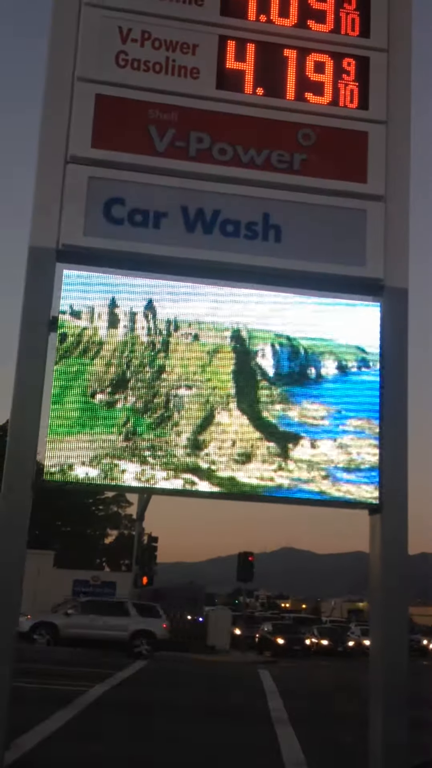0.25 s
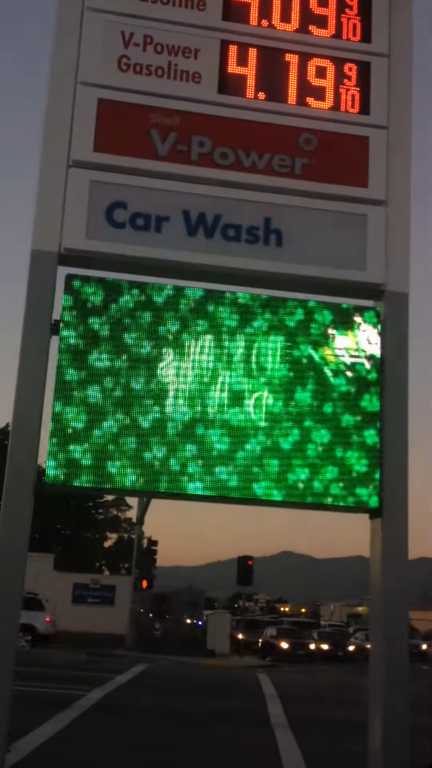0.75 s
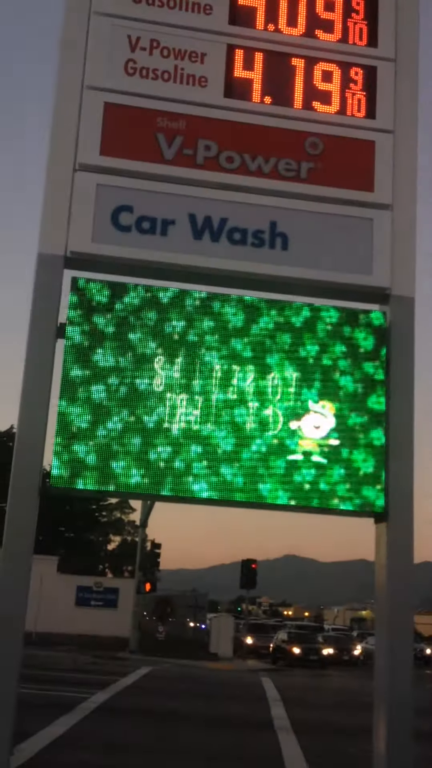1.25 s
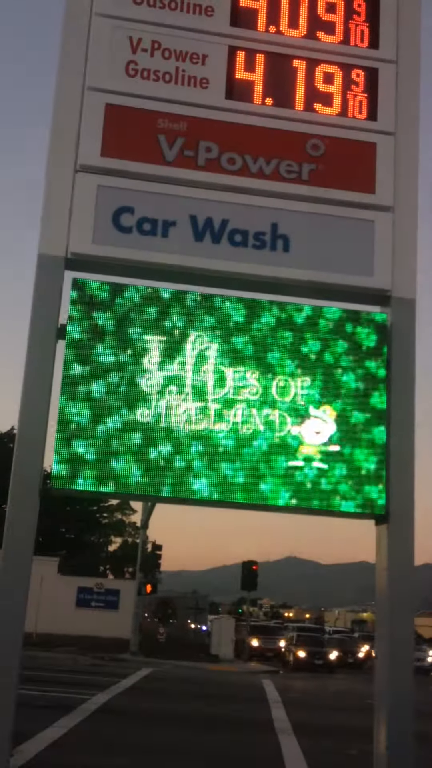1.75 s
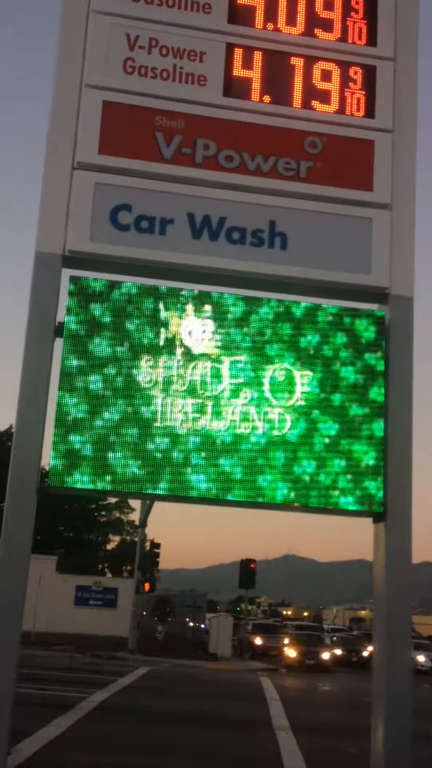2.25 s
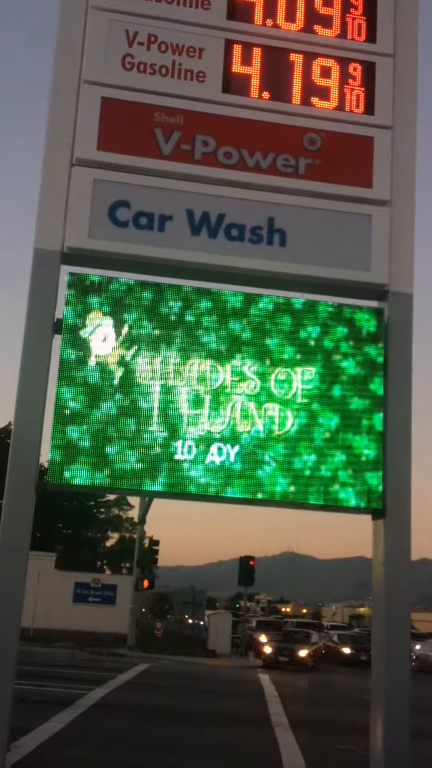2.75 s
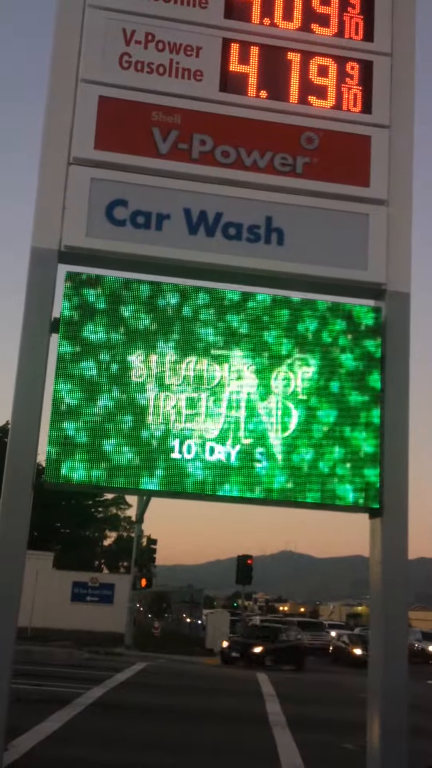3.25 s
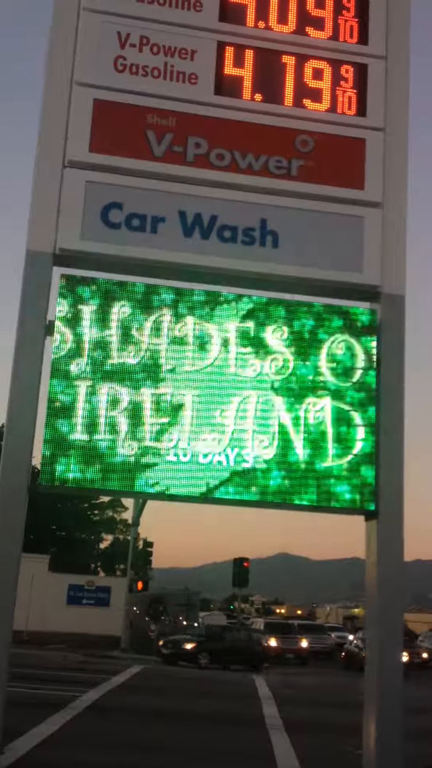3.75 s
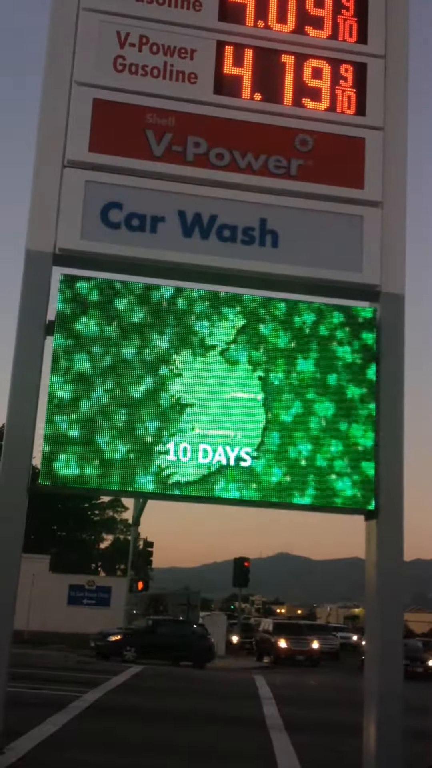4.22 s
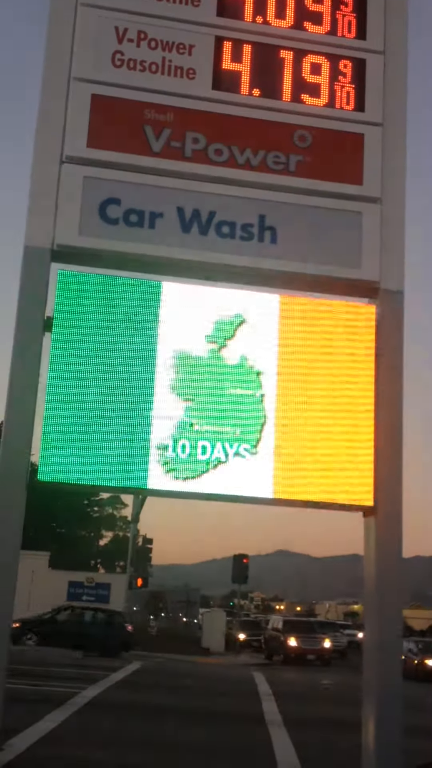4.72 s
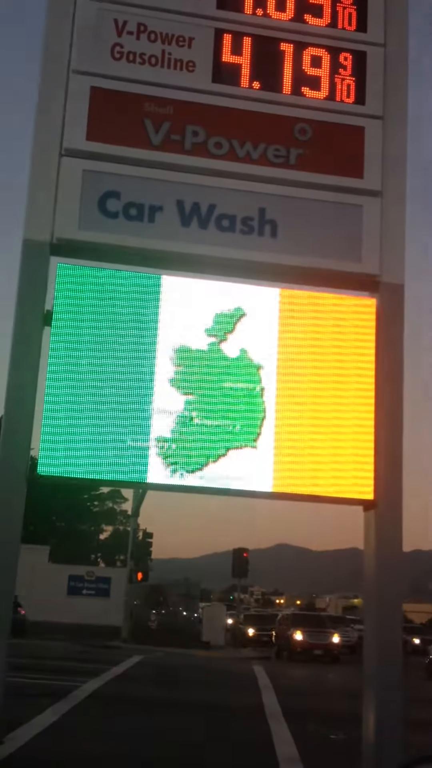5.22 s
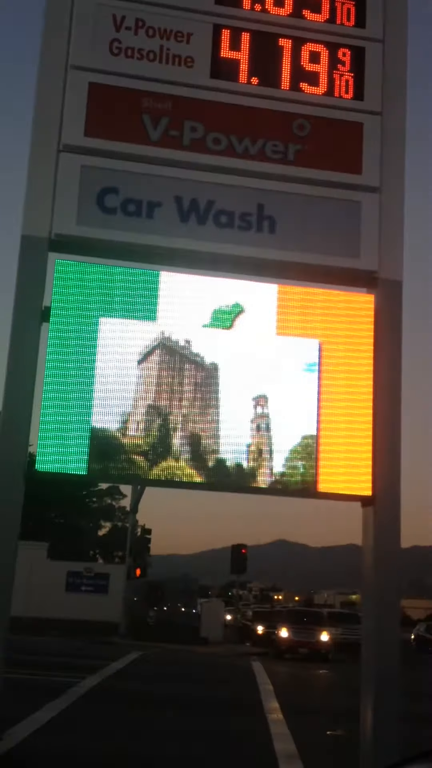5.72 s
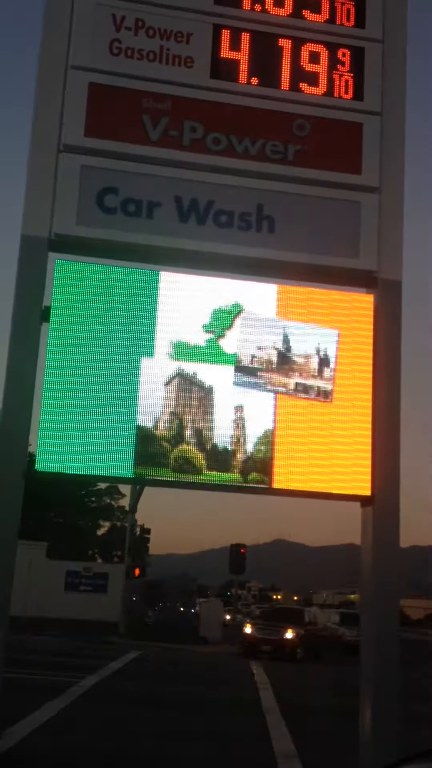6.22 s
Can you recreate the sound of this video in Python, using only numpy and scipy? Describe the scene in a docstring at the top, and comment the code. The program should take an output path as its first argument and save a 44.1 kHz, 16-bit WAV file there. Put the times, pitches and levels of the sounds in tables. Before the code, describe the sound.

Low idling traffic rumble under faint steady hiss; a twin-cylinder motorcycle pulls away, revs up, shifts with dull pops, and rides on.

```python
"""Idling traffic rumbles under a steady hiss; then a twin-cylinder motorcycle pulls away, revs out
first gear, shifts and rides on, with two pops and a faint whine on the way.
Traffic and hiss are noise shaped band by band. The motorcycle is a row of uneven clicks and gated noise
ringing its exhaust pipes, plus droning tones; the pops ring the same pipes; the whine is narrow noise."""
import sys
import numpy as np
from scipy import signal
from scipy.io import wavfile
from scipy.ndimage import uniform_filter1d

SR = 44100
rng = np.random.default_rng(int(sys.argv[2]) if len(sys.argv) > 2 else 0)


def dump(signal):
    """Clip the signal to [-1, 1] and save it as 16-bit WAV at the path in sys.argv[1]."""
    limited = np.clip(np.atleast_2d(signal).T, -1, 1)
    pcm = np.round(limited * 32767).astype(np.int16)
    wavfile.write(sys.argv[1], SR, pcm)


N = 285768   # length in samples


def from_db(db):
    """Turn a level in dB into a gain."""
    return 10 ** (np.asarray(db) / 20)


def in_time(rows):
    """Draw straight lines between the rows of a table: one curve for each column after the time."""
    seconds, *columns = np.transpose(rows)
    return [np.interp(np.arange(N) / SR, seconds, column) for column in columns]


def even(x, span_s=.2):
    """Level out a sound: divide it by its own running strength, so that its rms stays near 1."""
    span = int(span_s * SR)
    power = uniform_filter1d(uniform_filter1d(x ** 2, span), span)
    return x / np.sqrt(power + 1e-20)


def drift(rate_hz):
    """Wander at random, about as fast as rate_hz, with a standard deviation of 1."""
    step = 40   # samples between the points that are drawn
    r = np.exp(-2 * step * np.pi * rate_hz / SR)
    slow = signal.lfilter([1], [1, -2 * r, r * r], rng.standard_normal(N // step + 2002))
    slow = slow[2000:]   # skip the filter's settling
    return np.interp(np.arange(N) / step, np.arange(len(slow)), slow / slow.std())


def resonate(x, modes, count=1):
    """Ring resonances side by side with alternating sign; count=2 makes their skirts steeper."""
    out = 0
    for k, (hz, width_hz, db) in enumerate(modes):
        r = np.exp(-np.pi * width_hz / SR)
        top = [(1 - r * r) / 2, 0, (r * r - 1) / 2]
        bottom = [1, -2 * r * np.cos(2 * np.pi * hz / SR), r * r]
        ringing = x + 1e-18
        for _ in range(count):
            ringing = signal.lfilter(top, bottom, ringing)
        out = out + (-1) ** k * from_db(db) * ringing
    return out


def bandpass(x, band_hz, order=2):
    """Keep only what lies between two frequencies."""
    return signal.sosfilt(signal.butter(order, band_hz, "band", fs=SR, output="sos"), x)


def banded_noise(spectrum, patchy_db):
    """Add up noise bands about a third of an octave wide, each flickering on its own; total rms 1."""
    hz_at, db_at = np.transpose(spectrum)
    bands = int(3 * np.log2(hz_at[-1] / hz_at[0]))
    edges = np.geomspace(hz_at[0], 1.1 * hz_at[-1], 1 + bands)
    white = rng.standard_normal((2, N))   # neighbouring bands use different noise
    out = 0
    for k, (low, high) in enumerate(zip(edges, edges[1:])):
        band_db = np.interp(np.log(low * high) / 2, np.log(hz_at), db_at)
        out = out + bandpass(white[k % 2], [low, high]) * from_db(band_db + patchy_db * drift(4.8))
    return out / out.std()


# The colour of the traffic rumble. Each row: frequency in Hz, relative level in dB per Hz.
TRAFFIC_COLOUR = [(18, -67), (30, -28), (142, 4), (173, -1), (287, -12), (447, -29.5), (718, -23.5),
                  (792, -28), (874, -44), (1030, -19), (1500, -47), (1950, -65), (3300, -120)]
TRAFFIC_DB = -53   # rms


def traffic():
    """Many idling engines blur into a low noise whose bands flicker slightly."""
    return from_db(TRAFFIC_DB) * banded_noise(TRAFFIC_COLOUR, patchy_db=-0.5)


# The colour of the microphone hiss. Each row: frequency in Hz, relative level in dB per Hz.
HISS_COLOUR = [(880, -28), (1500, -3), (2030, -2), (2230, -6.5), (2710, -3.5), (3190, -5), (4230, -5),
               (9550, -14), (14600, -12.5), (15200, 0.5)]
HISS_DB = -76.5   # rms before the top is cut


def hiss():
    """The microphone's own noise is almost steady and reaches far up into the treble."""
    return from_db(HISS_DB) * banded_noise(HISS_COLOUR, patchy_db=.1)


# Engine speed; it stumbles as the throttle shuts. Each row: time in seconds, engine cycles per second.
ENGINE_SPEED = [(1.0, 15.31), (1.16, 16.21), (1.39, 20.63), (1.58, 21.06), (2.2, 19.34), (2.31, 18.44),
                (2.98, 27.13), (3.28, 30.51), (3.46, 31.93), (3.49, 26.21), (3.55, 31.88), (4.04, 23.77),
                (4.14, 25.33), (4.21, 21.79), (4.41, 22.32), (5.17, 25.36), (5.28, 26.1), (6.09, 27.25),
                (6.48, 30.17)]
# When the throttle is eased off. Each row: start in seconds, end in seconds.
THROTTLE_EASED = [(3.5, 4.15), (5.3, 6.16)]
FIRST_LAG = .76   # part of a cycle before the first cylinder fires
ROUGH_DB, EASED_ROUGH_DB = 1.0, 2.5   # how unequal the firings are, pulling and eased


def engine_run():
    """Count engine cycles by adding up the speed; the engine runs rougher when the throttle is eased."""
    rate, = in_time(ENGINE_SPEED)
    t, start = np.arange(N) / SR, ENGINE_SPEED[0][0]
    cycles = np.cumsum(rate * (t > start)) / SR - FIRST_LAG
    eased = sum(1. * (t > a) * (t < b) for a, b in THROTTLE_EASED)
    eased = uniform_filter1d(eased, SR // 20)
    rough_db = ROUGH_DB + (EASED_ROUGH_DB - ROUGH_DB) * eased
    return rate, cycles, eased, rough_db


NEAR_ECHO_S = 0.00912   # delay of the near echo


def firings(cycles, level_db, rough_db, echo_db):
    """Click at each whole cycle, with chance strengths; the second row is the echo close behind."""
    at = np.flatnonzero(np.diff(np.floor(cycles)) > 0)
    size = from_db(level_db + rough_db[at] * rng.standard_normal(400)[:len(at)])
    clicks = np.zeros((2, N + SR))
    clicks[0, at] = size
    clicks[1, at + int(NEAR_ECHO_S * SR)] = size * from_db(echo_db[at])
    return clicks[:, :N]


# Near echo of the first cylinder. Each row: time in seconds, level against the firing in dB.
NEAR_ECHO_LEVEL = [(1.0, -12), (1.8, 0), (2.3, -7), (4.15, -7.5), (4.3, -1.5), (5.0, 2.5), (5.3, -5.5),
                   (6.48, -11)]
TWIN_LAG = .43   # part of a cycle between the two cylinders
SECOND_DB = -4   # second cylinder against the first


def twin_firings(cycles, rough_db):
    """Two cylinders fire at uneven spacing, the second one weaker and with a weaker near echo."""
    echo_db, = in_time(NEAR_ECHO_LEVEL)
    first = firings(cycles, 0, rough_db, echo_db)
    second = firings(cycles - TWIN_LAG, SECOND_DB, rough_db, echo_db - 9.5)
    return first + second


# Echoes off walls and cars. Each row: delay in seconds, middle level in dB, around which it drifts.
FAR_ECHOES = [(.031, -19), (.072, -19), (.125, -22.5)]


def far_echoes(clicks):
    """Walls and cars send the firings back late and weaker, at slowly drifting strength."""
    far = np.zeros(N)
    for delay_s, db in FAR_ECHOES:
        late = int(delay_s * SR)
        far[late:] += from_db(db + 2.0 * drift(1.5)[late:]) * clicks[:-late]
    return far


def die_away(clicks):
    """Let each click fade over a few milliseconds, like a puff of gas."""
    return signal.lfilter([1], [1, -np.exp(-1 / (.004 * SR))], clicks)


# The ride. Each row: time in seconds, then levels in dB rms of the bark, the rasp,
# the 5th-order tone and the 7th-order tone (the tones also wobble and fade with pitch).
RIDE_LEVELS = [(1.0, -51, -72, -65, -76), (1.15, -50, -68.5, -43, -44.5), (1.3, -51.5, -74, -67, -37.5),
               (1.45, -45.5, -72, -40.5, -49), (1.62, -37, -86.5, -47.5, -60.5),
               (2.0, -38, -63, -47.5, -62), (2.26, -35, -63.5, -49, -49.5), (2.55, -37, -62.5, -46, -43.5),
               (2.75, -32, -58.5, -41, -46), (3.0, -35, -61, -33, -37), (3.26, -34, -56.5, -35.5, -47.5),
               (3.48, -38, -65, -38.5, -52), (3.54, -39.5, -71, -42, -44), (3.8, -42.5, -68, -38.5, -55),
               (4.0, -42.5, -67.5, -46.5, -46.5), (4.15, -49.5, -68, -55.5, -59),
               (4.27, -40.5, -63, -48.5, -44.5), (4.66, -43, -63.5, -48, -51),
               (4.92, -41, -67.5, -42, -46.5), (5.27, -42.5, -60, -42.5, -51),
               (5.38, -44.5, -65.5, -58.5, -63), (5.95, -47, -72, -42.5, -74),
               (6.13, -48, -69.5, -53.5, -71), (6.27, -40.5, -64.5, -50, -56),
               (6.48, -38.5, -64.5, -51, -43)]
# Pipe resonances, low to high. Each row: frequency in Hz, width in Hz of one pass, relative level in dB.
BOOM_MODES = [(97.9, 31, 2.5), (135.1, 140, -10.5)]
BARK_MODES = [(220, 89, 0)]
GROWL_MODES = [(330.7, 98, 0)]
RASP_MODES = [(470, 220, -10.5), (673, 302, 0)]
SNARL_MODES = [(999, 210, 12), (1450, 330, -5), (1900, 500, -29)]
# The silencer passes little else of the bark: lower and upper edge in Hz.
SILENCER_BAND = [179, 289.3]
# How loud boom, growl and snarl are. Each row: time in seconds, level in dB rms.
BOOM_LEVEL = [(1.0, -36), (1.12, -41), (1.6, -50.5), (2.4, -41), (2.7, -52), (3.45, -45.5), (3.6, -45),
              (3.95, -43), (4.3, -56.5), (5.5, -52), (6.48, -51.5)]
GROWL_LEVEL = [(1.0, -57.5), (1.8, -54.5), (2.3, -48), (2.9, -40.5), (3.45, -46), (3.8, -54), (4.15, -58.5),
               (4.7, -53), (5.3, -52.5), (6.1, -58.5), (6.48, -46.5)]
SNARL_LEVEL = [(1.0, -83), (1.8, -91), (2.05, -79.5), (2.55, -62), (3.3, -61), (3.55, -74), (4.35, -96),
               (4.55, -73), (4.9, -83.5), (6.48, -82)]


def exhaust_pipes(cycles, eased, rough_db):
    """Firings and the noise of rushing gas ring the pipes in five ranges, each with its own level."""
    bark_db, rasp_db, _, _ = in_time(RIDE_LEVELS)
    (boom_db,), (growl_db,), (snarl_db,) = in_time(BOOM_LEVEL), in_time(GROWL_LEVEL), in_time(SNARL_LEVEL)
    clicks, near = twin_firings(cycles, rough_db)
    far = far_echoes(clicks)
    puffs = die_away(clicks + far)
    flow = puffs + (1 + 2 * eased) * puffs.std()   # the gas never quite stops
    gas = flow * rng.standard_normal(N)
    low = clicks + near + far + .01 * rough_db * gas   # uneven running is also noisier
    high = (1 - .6 * eased) * (clicks + far) + .09 * gas   # the near echo is too dull to join in
    high = np.roll(high, int(.0025 * SR))   # the rasp peaks once the valve is wide open
    bark = bandpass(resonate(low, BARK_MODES), SILENCER_BAND)
    out = from_db(bark_db) * even(bark)
    out += from_db(boom_db) * even(resonate(low, BOOM_MODES, count=2))
    out += from_db(growl_db) * even(resonate(low + .03 * gas, GROWL_MODES, count=2))
    out += from_db(rasp_db) * even(resonate(high, RASP_MODES, count=2))
    out += from_db(snarl_db) * even(resonate(high, SNARL_MODES, count=2))
    return out


# Lower tones that follow the 5th. Each row: order (waves per engine cycle), level against the 5th in dB.
LOWER_ORDERS = [(3, -15), (4, -9)]
PIPE_FLOOR_HZ = 70   # the pipes radiate no tone below this
PIPE_S = 0.0044   # the tones crest this long after the first cylinder fires


def drone(rate, cycles, rough_db):
    """Some multiples of the engine's cycle rate (its orders) drone as plain, wobbling tones."""
    _, _, fifth_db, seventh_db = in_time(RIDE_LEVELS)
    tones = [(5, fifth_db), (7, seventh_db)]
    tones += [(round(order), fifth_db + db) for order, db in LOWER_ORDERS]
    out = np.zeros(N)
    for order, level_db in tones:
        hz = order * rate
        audible = np.clip((205 - hz) / 35, 0, 1)   # higher up the bark carries the order
        audible = audible * np.clip((hz - PIPE_FLOOR_HZ) / 30, 0, 1)
        gain = np.sqrt(2) * audible * from_db(level_db + .5 * rough_db * drift(33))
        out += gain * np.cos(2 * np.pi * order * (cycles - rate * PIPE_S))
    return out


OPENING_S = 0.18   # the throttle opens


def motorcycle():
    """One engine drives both the ringing pipes and the drone, and comes in as the throttle opens."""
    rate, cycles, eased, rough_db = engine_run()
    sound = exhaust_pipes(cycles, eased, rough_db) + drone(rate, cycles, rough_db)
    since_start = np.arange(N) / SR - ENGINE_SPEED[0][0]
    return -sound * np.clip(since_start / OPENING_S, 0, 1)


# Unburnt fuel popping on the overrun. Each row: time in seconds, level in dB (peak, for the loudest).
FUEL_POPS = [(3.737, -43.5), (3.922, -46)]


def pops():
    """Fuel bursts in the exhaust: short dull bangs ring the pipes' rasp and growl resonances."""
    clicks = np.zeros(N)
    for s, db in FUEL_POPS:
        clicks[round(s * SR)] = from_db(db)
    bang = clicks + .04 * die_away(clicks) * rng.standard_normal(N)
    bang = signal.sosfilt(signal.butter(2, 900, fs=SR, output="sos"), bang)   # the silencer dulls them
    rung = resonate(bang, RASP_MODES, count=2) + resonate(bang, GROWL_MODES, count=2)
    return rung * clicks.max() / np.abs(rung).max()   # the loudest pop peaks at its own level


# The faint whine. Each row: frequency in Hz, width in Hz of one pass, relative level in dB.
WHINE_MODES = [(1252, 150, 0)]
WHINE_S, WHINE_SPREAD_S, WHINE_DB = 4.6, .12, -74.5   # middle, spread, rms level at the middle


def whine():
    """A narrow band of noise swells and fades along a bell curve."""
    band = resonate(rng.standard_normal(N), WHINE_MODES, count=2)
    swell = np.exp(-.5 * ((np.arange(N) / SR - WHINE_S) / WHINE_SPREAD_S) ** 2)
    return from_db(WHINE_DB) * band / band.std() * swell


def scene():
    """Add the motorcycle, its pops and the whine to the traffic, as one channel."""
    return (traffic() + motorcycle() + pops() + whine())[None]


CUTOFF_HZ = 15340   # from here up the sound is at least 70 dB down


def record(dry):
    """The microphone drops the deep bass and hisses; the top is cut."""
    wet = signal.sosfilt(signal.butter(2, 50, "high", fs=SR, output="sos"), dry)
    wet = wet + hiss()
    return signal.sosfilt(signal.cheby2(28, 70, CUTOFF_HZ, fs=SR, output="sos"), wet)


dry = scene()
out = record(dry)
dump(out)
```